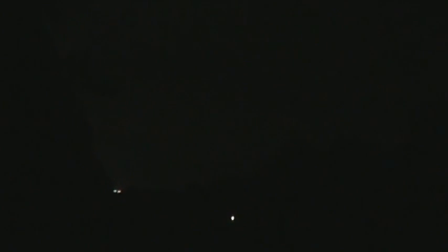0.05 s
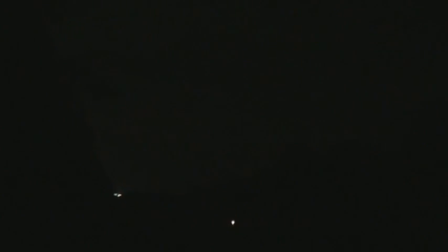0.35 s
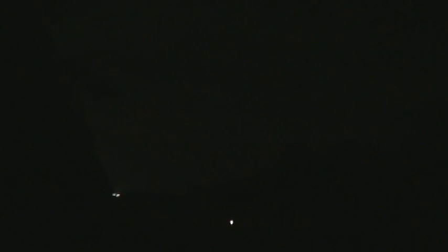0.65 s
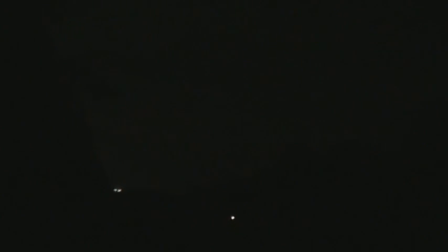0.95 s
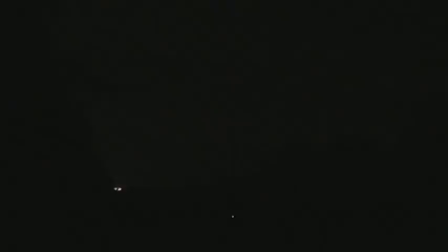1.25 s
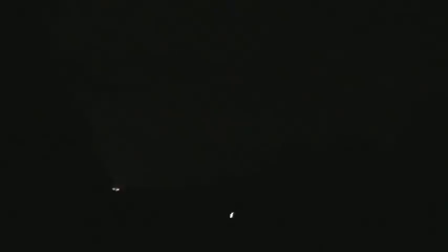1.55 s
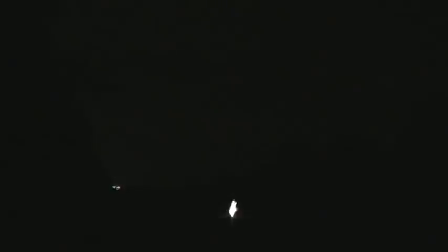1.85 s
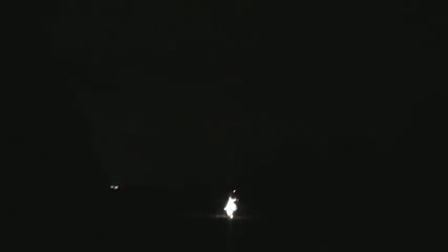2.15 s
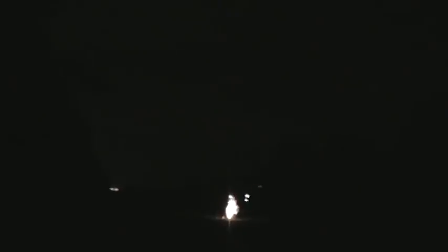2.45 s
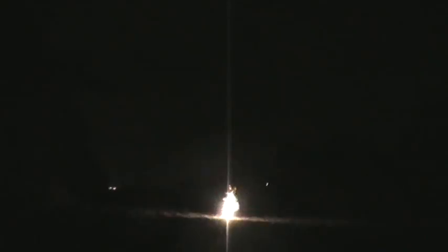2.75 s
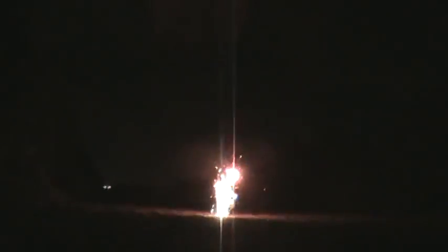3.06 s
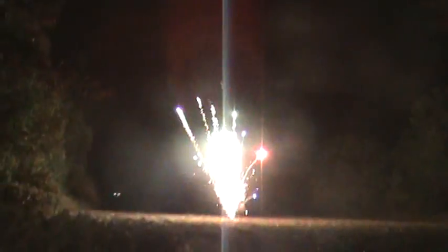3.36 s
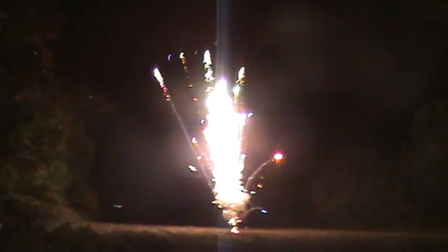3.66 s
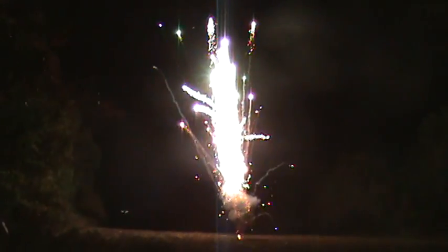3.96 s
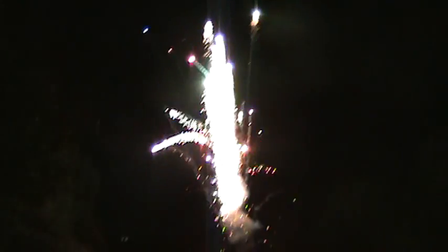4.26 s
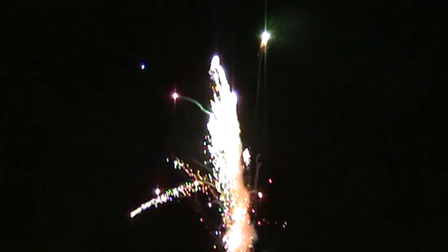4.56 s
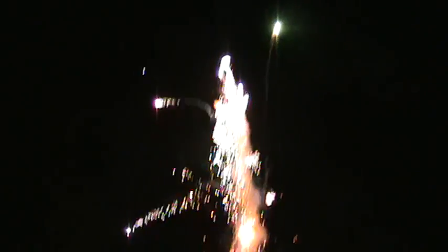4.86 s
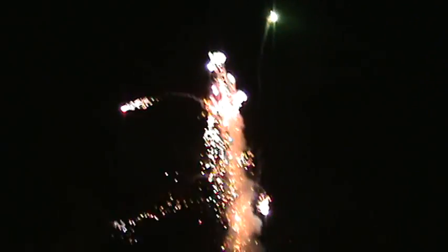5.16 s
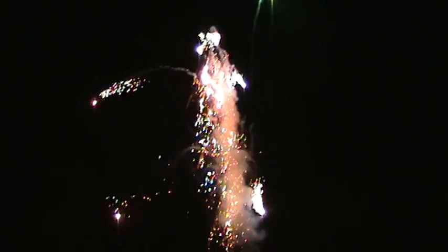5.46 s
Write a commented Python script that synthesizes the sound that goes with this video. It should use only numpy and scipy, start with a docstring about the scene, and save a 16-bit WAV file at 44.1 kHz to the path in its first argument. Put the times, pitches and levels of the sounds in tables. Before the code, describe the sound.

Close, high katydid ticks and buzzes stand out against distant crickets outdoors at night. Then a fountain firework cracks once, surges with hisses and low thumps, and whooshes into a short roar. Irregular sharp bangs and little pops continue as the flame dies down, the loudest near the end. The camcorder microphone hears a soft wash returning from the surrounding trees.

```python
"""Crickets trill far off and a near katydid ticks and buzzes its wings, on a tree-ringed lawn at night.
A homemade fountain firework on the ground catches with a hiss, coughs gas, flares into a roar and
burns on softly while its stars burst in sharp cracks. The tree line returns the firework as a soft
wash. A camcorder with close-set microphones listens and adds a thin whine of its own."""
import sys
import numpy as np
from scipy import signal
from scipy.fft import rfft, irfft, next_fast_len
from scipy.io import wavfile

SR = 44100
rng = np.random.default_rng(int(sys.argv[2]) if len(sys.argv) > 2 else 0)


def transcribe(signal):
    """Save signal, clipped to [-1, 1], as a 16-bit WAV file at the path in sys.argv[1]."""
    frames = np.atleast_2d(signal).T
    limited = np.clip(frames, -1, 1)
    pcm = np.round(limited * 32767).astype(np.int16)
    wavfile.write(sys.argv[1], SR, pcm)


N = 243431
T = np.arange(N) / SR
FFT_SIZE = next_fast_len(N + 2 * SR)
FREQ = np.maximum(np.arange(FFT_SIZE // 2 + 1) * SR / FFT_SIZE, 1)
LEFT_RIGHT = np.array([[1], [-1]])

# bursting stars: start_s, level_db, blast_ms, bounce_lag_ms, bounce_gain_db, to_trees_db
STARS = [(2.3537, -0.5, 0.13, 1.8, -30, 5), (3.0479, -4, 0.26, 1.16, -6, -0.5),
         (3.8194, -11, 0.062, 2.6, -0.5, -18), (4.0697, -18.5, 0.019, 1.6, -1, -19),
         (4.1095, -26, 0.064, 2.7, -7, -38), (4.1445, -1.5, 0.15, 2.53, 2.5, 3),
         (4.4173, -2, 0.14, 3.1, -6.5, -4), (4.5604, -20, 0.02, 2.1, -16, -39),
         (4.6444, -22.5, 0.067, 2.8, -18, -25.5), (4.8023, -2, 0.22, 2.44, 0.5, -4),
         (5.0666, 5, 0.3, 1.68, -4.5, 6), (5.3005, -21.5, 0.15, 2, 6, -28)]
# colour of a blast at the microphone: frequency_hz, gain_db
BLAST_SPECTRUM = [(60, -5.5), (250, -5), (600, -5.5), (1500, -3.5), (3500, 2), (6500, 6.5), (9500, 2.5),
                  (11500, -11), (16000, -59)]
# jet surges, each opening with a gulp of flame:
# start_s, hold_s, hiss_db, gulp_hold_s, gulp_roar_db, gulp_rumble_db
SURGES = [(2.158, .013, -47.5, .01, -79, -76), (2.841, 0.061, -41, 0.055, -43, -42.5),
          (2.91, 0.182, -35.5, 0.065, -44.5, -44), (3.091, 0.14, -25.5, 0.019, -30.5, -35.5),
          (3.2, 0.034, -46, 0.022, -33, -35)]
# coughs of gas from the tube: start_s, level_db, pitch_hz
COUGHS = [(2.8205, -31.5, 136), (2.858, -31.5, 134), (2.882, -42.5, 170), (2.939, -32, 155),
          (3.049, -30.5, 153), (3.093, -27, 174), (3.124, -22, 166), (3.205, -17, 188),
          (3.2384, -16.5, 121), (3.260, -16.5, 137), (3.326, -21.5, 140)]
# hiss of the jet: frequency_hz, gain_db
HISS_SPECTRUM = [(300, -15), (1200, -10.5), (2500, -7.5), (4000, -3.5), (6700, 1), (8000, -1.5),
                 (9600, -3.5), (11000, -18.5), (13000, -29.5), (16000, -36)]
# roar of the flame: frequency_hz, gain_db
ROAR_SPECTRUM = [(60, -18), (200, -6), (550, 3), (1000, 0.5), (1600, -3), (2800, -3.5), (4500, -6.5),
                 (7000, -8), (9500, -25), (12000, -39), (16000, -75)]
# rumble of the plume: frequency_hz, gain_db
RUMBLE_SPECTRUM = [(25, -21), (60, -6), (100, 2.5), (150, 2.5), (220, -4), (320, -19), (600, -17),
                   (2000, -70)]
# phase by which the right microphone leads for the fountain: frequency_hz, lead_rad
RIGHT_MIC_LEAD = [(30, 0.65), (120, 0.63), (300, 1.35), (800, 1.04), (1800, 0.75), (4000, 0.59),
                  (12000, 0.7)]
# colour of the echo from trees and grass: frequency_hz, gain_db
ECHO_SPECTRUM = [(60, 8), (250, -7), (550, -2.5), (1200, -0.5), (2200, 1.5), (4000, 2.5), (6500, 2),
                 (8500, -2.5), (11000, 0.5), (16000, -38)]
# rise and fall of the wash from the tree line: lag_s, gain_db
TREE_ENVELOPE = [(0, -5), (.015, -0.5), (0.032, 3), (.07, -3.5), (.112, -8), (.15, -7), (.2, -12),
                 (.4, -23.5), (.7, -54), (1.4, -67)]
# stereo width of echoes from all around: frequency_hz, side_minus_mid_db
ECHO_WIDTH = [(60, -12), (200, -9), (600, -7.5), (1400, -1), (2200, -3.5), (3800, -6), (6500, -8.5),
              (10000, 0.5), (15000, 7)]
# single ticks of the near katydid: start_s, level_db
KATYDID_TICKS = [(1.3284, -34), (1.3804, -25), (1.4093, -18.5), (1.4555, -17), (1.484, -16), (1.513, -17),
                 (1.5507, -15.5), (1.5815, -14.5), (1.613, -15), (1.6433, -16)]
# katydid buzzes: start_s, length_s, strokes_per_s, level_db, pitch_hz, pan_left_db
KATYDID_BUZZES = [(0, 0.035, 79, -40, 8700, 0), (0.098, .066, 88, -35.5, 8700, 0),
                  (0.218, 0.087, 83, -37.5, 8700, 0.5), (1.646, 0.027, 108, -14.5, 9650, 5),
                  (1.717, 0.086, 155, -16, 9500, 6.5), (1.832, 0.088, 157, -14, 9440, 6.5)]
# colour of a katydid's wing: pitch_multiple, gain_db
WING_SPECTRUM = [(.15, -26), (.35, -28.5), (.62, -14.5), (.82, -7.5), (.97, 3.5), (1.06, 3), (1.2, -10.5),
                 (1.65, -41)]
# far cricket chorus: pitch_hz, rough_width_hz, level_db, pulses_per_s, pulse_depth (0-1)
CRICKET_BANDS = [(1436, 460, -71, 40, 0.25), (1825, 170, -67, 79, 0.27), (2160, 290, -76, 50, 0.2),
                 (4197, 600, -62.5, 50, 0.23), (4310, 130, -64, 54.6, 0.4), (4635, 260, -66.5, 57, 0.3),
                 (8550, 2400, -77, 59, 0.1)]
# night air over the lawn: frequency_hz, gain_db
NIGHT_SPECTRUM = [(20, -9), (45, 4), (75, 0.5), (120, -9), (250, -15), (500, -23), (900, -29), (2800, -32),
                  (6000, -35.5), (12000, -34), (16000, -39.5)]
# stereo width of the air and the crickets: frequency_hz, side_minus_mid_db
NIGHT_WIDTH = [(60, -24.5), (150, -11), (350, 0), (800, 11.5), (1300, 3), (1900, 1), (3000, 8), (4300, -11),
               (6000, 2), (9000, -4.5), (15000, 1.5)]


def star_cracks(tree_echo, bounce_hz=1700, front_ms=0.16, tree_lag_s=0.006, grass_db=-5.5):
    """Each star bursts in one blast wave that bounces off the lawn; its front scatters in the trees."""
    direct, bounce, to_trees = np.zeros((3, N))
    for start, db, blast_ms, lag_ms, bounce_db, trees_db in STARS:
        add(direct, start, undb(db) * blast(blast_ms))
        add(bounce, start + lag_ms / 1000, undb(db + bounce_db) * blast(blast_ms))
        add(to_trees, start + tree_lag_s, undb(trees_db) * blast(front_ms))
    # the microphone turns the phase of the treble, so each blast dips before it peaks
    mic_phase = (1 - 1j * FREQ / 1700) / (1 + 1j * FREQ / 1700)
    colour = causal(over_hz(BLAST_SPECTRUM)) * mic_phase
    grass = undb(grass_db + over_hz(ECHO_SPECTRUM)) * foliage(t60_s=0.17)
    near = shape(direct, colour * (1 + grass)) + shape(bounce, colour / (1 + 1j * FREQ / bounce_hz))
    return near + shape(to_trees, colour * tree_echo)


def blast(length_ms):
    """A pressure jump that turns to suction after length_ms, of unit energy."""
    age = 1000 * T[:SR // 100] / length_ms
    wave = (1 - age) * np.exp(-age)
    return wave / np.linalg.norm(wave)


def fountain(tree_echo, sparks_per_s=5000, flutter_db=1.9, rumble_flutter_db=0.5, bright_hz=1500,
             bright_slope=0.63, full_drive_db=-35, jet_trees_db=-9, flame_trees_db=-2, pan_left_db=-1):
    """A hissing jet full of tiny sparks over a sputtering flame and a rumbling plume."""
    hiss_db, roar_db, rumble_db = burn_levels()
    sparks = rng.standard_normal(N) * (rng.random(N) < sparks_per_s / SR)
    grain = unit(sparks) + rng.standard_normal(N)
    hiss = unit(shape(grain, undb(over_hz(HISS_SPECTRUM)))) * undb(hiss_db + flutter_db * wander(90))
    sputter = wander(120)
    flame = noise(ROAR_SPECTRUM)
    body = shape(flame, 1 / (1 + (FREQ / bright_hz) ** 2))
    brightness = undb(bright_slope * (roar_db - full_drive_db))  # a harder flame is brighter
    roar = (body + (flame - body) * brightness) * undb(roar_db + flutter_db * sputter)
    rumble = noise(RUMBLE_SPECTRUM) * undb(rumble_db + rumble_flutter_db * sputter)
    mics = np.exp(-0.5j * LEFT_RIGHT * over_hz(RIGHT_MIC_LEAD)) * undb(LEFT_RIGHT * pan_left_db / 2)
    # the jet sounds from the mouth of the tube; the tall flame reaches the trees better
    jet = shape(hiss + rumble + coughs(), mics + undb(jet_trees_db) * tree_echo)
    return jet + shape(roar, mics + undb(flame_trees_db) * tree_echo)


def burn_levels(catch_db_per_s=20.5, caught_s=2.7, flame_s=3.251):
    """Hiss, roar and rumble in dB as the charge smoulders, surges, flares and sinks to a steady burn."""
    smoulder = undb(catch_db_per_s * np.minimum(T - caught_s, 0)) * (T < flame_s)
    flare = swell(flame_s, attack_s=0.028, hold_s=0.13, release_s=0.08)
    sink = swell(flame_s, attack_s=0.028, hold_s=0.13, release_s=0.44)
    steady = T > flame_s
    hiss = [undb(-47) * smoulder, undb(-36.5) * flare, undb(-45) * sink, undb(-61.5) * steady]
    roar = [undb(-61) * smoulder, undb(-31) * flare, undb(-37) * sink, undb(-53) * steady]
    rumble = [undb(-34.5) * flare, undb(-44.5) * sink]
    for start, hold_s, hiss_db, gulp_hold_s, roar_db, rumble_db in SURGES:
        jet = undb(hiss_db) * swell(start, attack_s=0.0061, hold_s=hold_s, release_s=0.0063)
        gulp = swell(start, attack_s=0.003, hold_s=gulp_hold_s, release_s=0.017)
        hiss += [jet]
        roar += [undb(-20) * jet, undb(roar_db) * gulp]
        rumble += [undb(rumble_db) * gulp]
    powers = [sum(part ** 2 for part in parts) for parts in (hiss, roar, rumble)]
    return [10 * np.log10(power + 1e-20) for power in powers]


def coughs(ring_s=0.006, front_s=0.00017, front_db=-3):
    """Slugs of gas leave the tube: a steep front and a cycle or two of low swing."""
    track, t = np.zeros(N), T[:SR // 10]
    front = undb(front_db) * np.exp(-t / front_s)
    for start, db, hz in COUGHS:
        swing = np.exp(-t / ring_s) * np.cos(2 * np.pi * hz * t)
        add(track, start, undb(db) * (swing + front))
    return shape(track, resonance(hz=310, width_hz=3000))


def tree_line(treble_loss_db_per_s=18, split_hz=5500):
    """Response of the trees around the lawn: countless small echoes, the later ones duller."""
    lag_s, db = np.transpose(TREE_ENVELOPE)
    wash = surround(undb(over_hz(ECHO_SPECTRUM)), ECHO_WIDTH) * undb(np.interp(T, lag_s, db, right=-200))
    low = shape(wash, 1 / (1 + (FREQ / split_hz) ** 4))
    wash = low + (wash - low) * undb(-treble_loss_db_per_s * T)
    return rfft(wash / np.linalg.norm(wash), FFT_SIZE)


def foliage(t60_s):
    """Response of nearby grass or leaves: a dense fading tail, about unit energy per channel."""
    tail = surround(np.ones(len(FREQ)), ECHO_WIDTH) * undb(-60 * T / t60_s)
    return rfft(tail / np.sqrt(np.sum(tail ** 2) / 2), FFT_SIZE)


def katydids(scrape_t60_s=0.0069, direct_db=6.5, leaves_db=12.5, jitter_periods=0.12, jitter_db=1.4):
    """Each wing stroke is a tiny scrape, alone as a tick or repeated in a swelling buzz."""
    fade = undb(-60 * T / scrape_t60_s)
    scrape = rfft(fade / np.linalg.norm(fade), FFT_SIZE)
    teeth = rng.standard_normal(N)  # no two scrapes are alike
    leaves = undb(leaves_db) * foliage(t60_s=0.22)

    def sing(strokes, hz, pan_left_db):
        """Scrapes ring the wing and reach the microphones directly and through the leaves."""
        wing = causal(over_hz([(multiple * hz, db) for multiple, db in WING_SPECTRUM]))
        side_db = LEFT_RIGHT * pan_left_db / 2
        paths = undb(direct_db + side_db) + leaves * undb(side_db / 2)
        return shape(teeth * shape(strokes, scrape), wing * paths)

    strokes = np.zeros(N)
    for start, db in KATYDID_TICKS:
        add(strokes, start, undb([db]))
    song = sing(strokes, hz=9700, pan_left_db=5)
    for start, length, rate, db, hz, pan_left_db in KATYDID_BUZZES:
        strokes = np.zeros(N)
        for lag, (late, loud) in zip(np.arange(0.5 / rate, length, 1 / rate), rng.normal(size=(32, 2))):
            strength = undb([db + jitter_db * loud]) * np.sin(np.pi * lag / length)
            add(strokes, start + lag + jitter_periods * late / rate, strength)
        song += sing(strokes, hz, pan_left_db)
    return song


def crickets(waver_db=2.0, rate_drift=0.018):
    """Many far singers blur into bands; each kind pulses at its own wing rate."""
    chorus = 0
    for hz, width_hz, db, rate, depth in CRICKET_BANDS:
        wing_hz = rate * (1 + rate_drift * wander(4.34))
        trill = unit(1 + depth * np.sin(2 * np.pi * np.cumsum(wing_hz) / SR))
        # the fifth power steepens and narrows the band, so it starts out wider
        band = surround(np.abs(resonance(hz, 2.13 * width_hz)) ** 5, NIGHT_WIDTH)
        chorus += band * trill * undb(db + waver_db * wander(6.5))
    return chorus


def night_air(level_db=-56, waver_db=0.53):
    """Low far rumble and faint hiss from all around the lawn."""
    return surround(undb(over_hz(NIGHT_SPECTRUM)), NIGHT_WIDTH) * undb(level_db + waver_db * wander(7))


def camcorder_whine(pitch_hz=12270, level_db=-80):
    """The camcorder's own thin tone, alike in both microphones."""
    return undb(level_db) * unit(np.sin(2 * np.pi * pitch_hz * T))


def undb(db):
    """Decibels to amplitude."""
    return 10 ** (np.asarray(db) / 20)


def unit(x):
    """Scale to rms 1."""
    return x / np.sqrt(np.mean(x ** 2))


def over_hz(points):
    """Join (frequency_hz, value) points on a log-frequency axis."""
    hz, value = np.transpose(points)
    return np.interp(np.log(FREQ), np.log(hz), value)


def shape(x, response):
    """Filter by a frequency response."""
    return irfft(rfft(x, FFT_SIZE) * response, FFT_SIZE)[..., :N]


def causal(db):
    """The response with these gains that rings only after a blow."""
    cepstrum = irfft(np.log(undb(db)), FFT_SIZE)
    return np.exp(rfft(2 * cepstrum[:FFT_SIZE // 2], FFT_SIZE) - cepstrum[0])


def resonance(hz, width_hz):
    """Band-pass response, gain 1 at the centre."""
    return 1 / (1 + 1j * (FREQ / hz - hz / FREQ) * hz / width_hz)


def noise(spectrum):
    """Coloured noise of rms 1."""
    return unit(shape(rng.standard_normal(N), undb(over_hz(spectrum))))


def surround(response, width):
    """Coloured noise from all around; its mid part has rms 1."""
    mid, side = shape(rng.standard_normal((2, N)), np.array([response, response * undb(over_hz(width))]))
    return (mid + LEFT_RIGHT * side) / np.std(mid)


def wander(rate_hz):
    """A random drift that stays mostly between -1 and 1."""
    points = rng.standard_normal(int(N / SR * rate_hz) + 2)
    return 0.48 * np.interp(T * rate_hz, np.arange(len(points)), points)


def swell(start_s, attack_s, hold_s, release_s):
    """An envelope that rises, holds, then dies away."""
    age = np.maximum(T - start_s, 0)
    return (1 - np.exp(-age / attack_s)) * np.exp(-np.maximum(age - hold_s, 0) / release_s)


def add(track, start_s, sound):
    """Mix a short sound into a track."""
    i = max(int(round(start_s * SR)), 0)
    track[i:i + len(sound)] += sound[:max(N - i, 0)]


def scene():
    """The firework and its echo from the trees, among the night insects."""
    tree_echo = tree_line()
    firework = star_cracks(tree_echo) + fountain(tree_echo)
    return firework + katydids() + crickets() + night_air() + camcorder_whine()


def record(dry, ceiling=0.55, top_hz=15800):
    """The camcorder rounds the tallest peaks and cuts the top."""
    oversampled = signal.resample_poly(dry, 2, 1, axis=1)
    rounded = oversampled / (1 + (oversampled / ceiling) ** 4) ** (1 / 4)
    rounded = signal.resample_poly(rounded, 1, 2, axis=1)
    return signal.sosfilt(signal.ellip(8, 0.2, 70, top_hz, fs=SR, output="sos"), rounded)


dry = scene()
out = record(dry)
transcribe(out)
```